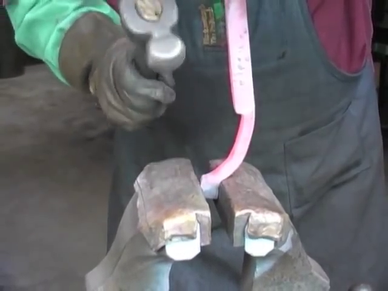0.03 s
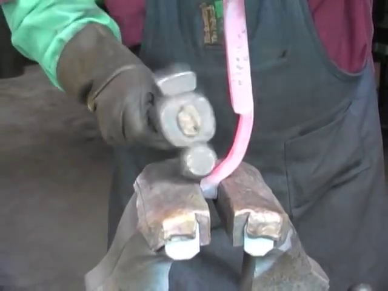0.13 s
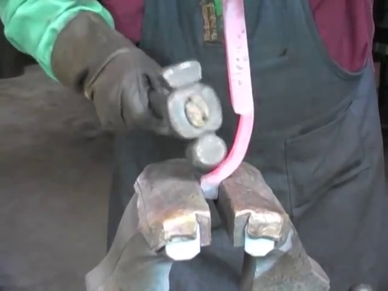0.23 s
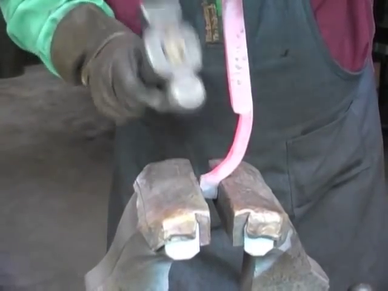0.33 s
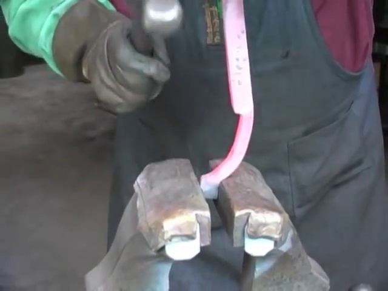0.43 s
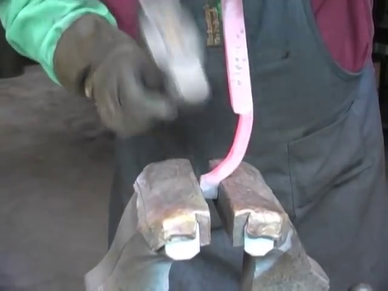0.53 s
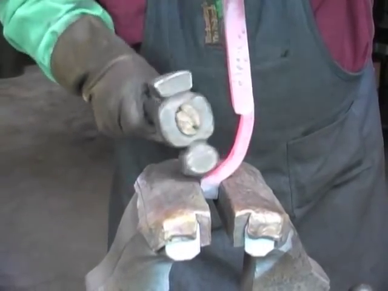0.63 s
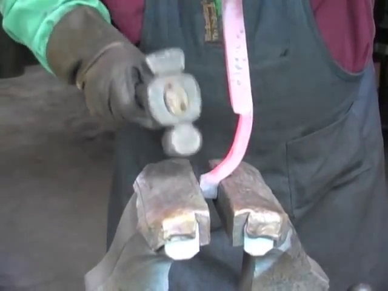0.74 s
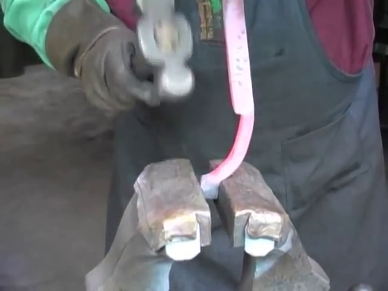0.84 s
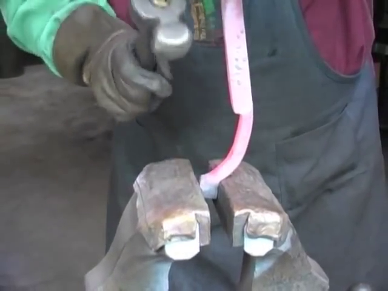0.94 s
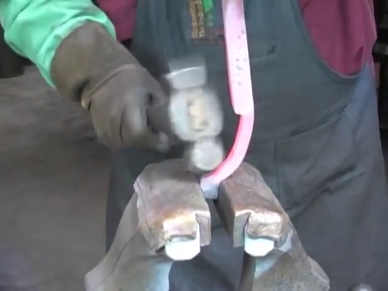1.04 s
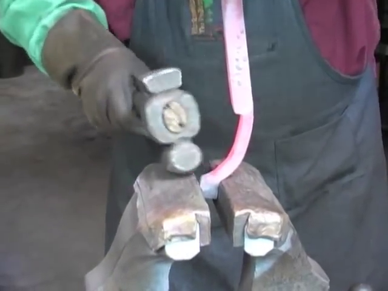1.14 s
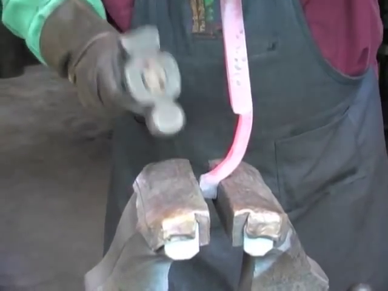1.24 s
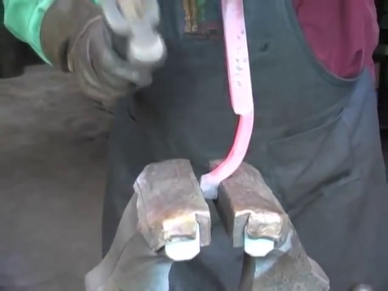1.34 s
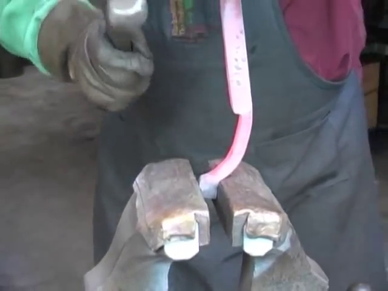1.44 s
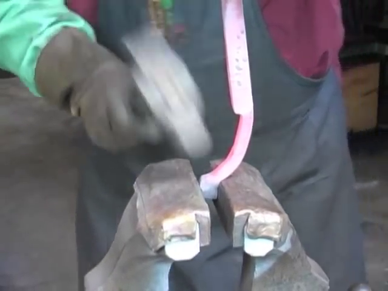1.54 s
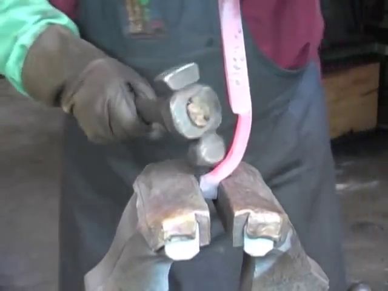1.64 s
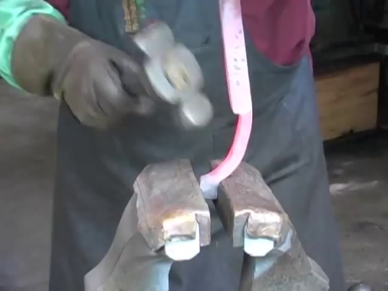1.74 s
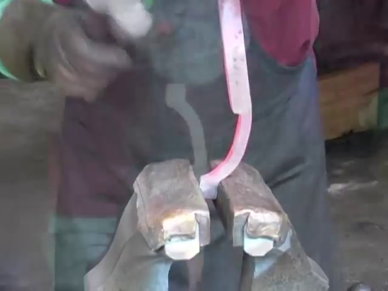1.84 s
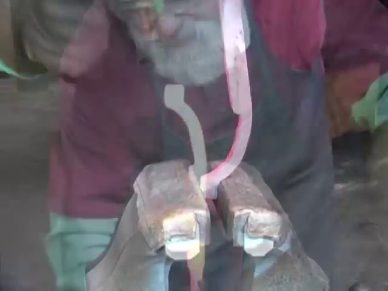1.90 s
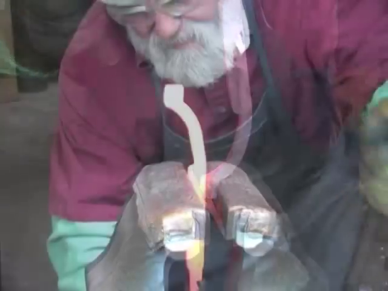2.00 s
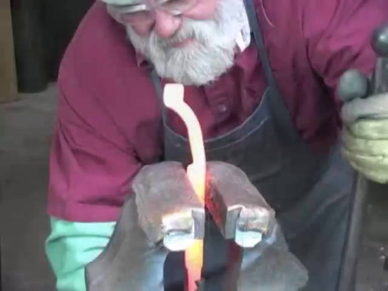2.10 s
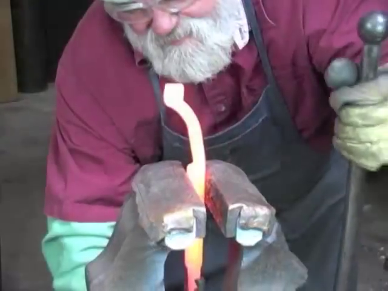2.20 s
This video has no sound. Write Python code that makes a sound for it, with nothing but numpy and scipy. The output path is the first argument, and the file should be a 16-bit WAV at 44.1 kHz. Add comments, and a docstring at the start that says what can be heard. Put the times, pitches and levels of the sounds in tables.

```python
"""Four hard, ringing hammer blows on red-hot steel in a vise, close to the microphones; a light metal tap follows.
The echo and last ringing of an earlier blow open the scene.
Each strike sums decaying noise (the clack), damped sines (hammer and vise) and a low thud through the stand.
The workshop answers by convolution with decaying noise.
Behind it lie a machine's hum and air, made of shaped noise, and a faint steady whine."""
import sys
import numpy as np
from scipy import signal
from scipy.fft import rfft, irfft
from scipy.io import wavfile

SR = 44100
rng = np.random.default_rng(int(sys.argv[2]) if len(sys.argv) > 2 else 0)


def to_wav(sig):
    """Store sig (one row per channel, or 1-D mono) as 16-bit WAV at the path in sys.argv[1].

    Samples outside -1..1 are clipped; the rate is SR.
    """
    pcm = np.clip(np.atleast_2d(sig), -1, 1) * 32767
    pcm = np.round(pcm).astype(np.int16)
    wavfile.write(sys.argv[1], SR, pcm.T)  # frames by channels


N = 101430

# Hammer blows, timed from the start of what is heard; a negative time is an earlier blow:
# (time [s], level [dB], extra ring level [dB], treble tilt [dB per octave], clack t60 [s],
#  extra thud level [dB], first favoured mode [Hz], second favoured mode [Hz])
HAMMER_BLOWS = [(-0.235, 1.5, -4, -0.5, 0.077, 1.5, 1690, 2914),
                (0.2115, 2, -2, 0.85, 0.037, -4, 2914, 7607), (0.6487, -4, -5, 0.24, 0.066, 5, 1690, 10788),
                (1.1127, 0.5, -4.5, -0.43, 0.041, -1.5, 3030, 3911),
                (1.6298, 0.5, -0.5, -0.36, 0.051, 1, 4742, 3030)]
# Light taps of metal on the vise: same columns as the blows
VISE_TAPS = [(2.2254, -20, -7, 0.91, 0.077, 0, 3030, 6060)]
# Colour of the clack, dense and quickly damped modes: (frequency [Hz], relative level per Hz [dB])
CLACK_COLOUR = [(100, -13), (400, -14.5), (800, -5.5), (1200, -4), (2300, -4), (3000, -4), (3400, -3.5),
                (4600, 1.5), (5400, -2.5), (6200, 2.5), (7200, 3.5), (8000, 1), (8900, 0), (9500, -4.5),
                (11000, -4), (12000, -7), (12800, -2), (14000, -22)]
# Colour of the thud through the stand: (frequency [Hz], relative level per Hz [dB])
THUD_COLOUR = [(30, -28), (70, -10.5), (170, 2), (300, -8.5), (700, -13.5), (2000, -37)]
# Ringing modes of hammer and vise, three lists in the same order: (pitch [Hz])
MODE_PITCHES = [1690, 1755, 2914, 3030, 3640, 3911, 4742, 6060, 6260, 6581, 6780, 7607, 8845, 10788]
# Base level of each mode, before the strike's own offsets: (level [dB])
MODE_LEVELS = [-38.5, -47, -42, -40.5, -39.5, -42, -45.5, -43.5, -40, -49.5, -43.5, -45.5, -41, -33]
# Decay of each mode: (t60 [s])
MODE_DECAYS = [0.091, 0.26, 0.11, 0.11, 0.087, .13, 0.13, .1, .17, 0.061, .11, 0.12, .08, 0.047]
# Colour of the workshop's echo tail: (frequency [Hz], relative level [dB])
ECHO_COLOUR = [(60, -4.5), (300, -1), (900, -2), (1900, 4), (3500, 0), (7000, -4), (10000, -6), (14000, -9)]
# Decay of the echo tail: (frequency [Hz], t60 [s])
ECHO_DECAY = [(100, 1), (700, 0.58), (1800, 0.57), (4000, 0.51), (8000, 0.44), (13000, .36)]
# Machine hum, before background level and pan: (frequency [Hz], level [dB], width at half gain [Hz])
HUM_BANDS = [(167, -71, 12), (230.3, -71, 20), (375.5, -73.5, 23), (450.6, -83, 10)]
# Colour of machine rumble and air: (frequency [Hz], relative level per Hz [dB])
AIR_COLOUR = [(25, -17.5), (50, -16), (78, -0.5), (115, -9.5), (170, -6), (240, 2.5), (300, -2.5),
              (390, -1), (520, -10), (800, -17.5), (1700, -18), (3200, -21.5), (7000, -25), (13000, -28.5),
              (15000, -30)]
# Course of the hum and air: (time [s], level [dB])
BACKGROUND_LEVEL = [(0, -1), (1.6, -0.5), (1.85, -3.5), (2.0, -5.5), (2.3, -2)]

# Strike: base levels in dB, times in seconds
CRACK_DB, CRACK_T60_S = -28, 0.0138  # the first instant of contact
CLACK_DB, CONTACT_S = -24, 0.0013
CHATTER_DB, CHATTER_T60_S = -41, 0.13  # the work shudders in the jaws
THUD_DB, THUD_RISE_S, THUD_T60_S = -44, 0.0077, 0.18
FAVOUR_DB, FAVOUR_WIDTH_HZ = 9, 70  # lift of the modes near the favoured pitches
MODE_SCATTER_DB = 2.5  # standard deviation
STRIKE_S, LEAD_S = 0.4, 0.5  # length of one strike; time kept ahead of the start

# Workshop: ring and tap levels are offsets on what is sent into the room
ROOM_DB, ROOM_BUILD_S, ECHO_S = -8, 0.0054, 0.8
NEAR_DB, NEAR_DELAY_S, NEAR_T60_S = -10, 0.0037, 0.16  # reflections off the smith and the floor
RING_ROOM_DB, TAP_ROOM_DB = -6.5, -10  # the pure ring carries into the room less than the clack
ROOM_SHARED = 0.47  # share of the echo's power that is alike at both microphones

# Machine: levels before pan
AIR_DB, AIR_SIDE_DB = -65.5, -8  # the side level is relative to the middle
WHINE_HZ, WHINE_DB = 2447, -82

PAN_DB, MACHINE_PAN_DB = -4, -4  # left minus right
TOP_HZ = 14200


def strike(t, hz, level_db, ring_db, tilt_db, clack_t60, thud_db, first_hz, second_hz):
    """Steel meets steel: crack, clack and chatter of many modes, a few long modes, and the stand's thud."""
    contact = clack(t, hz, tilt_db, clack_t60) + ring(t, ring_db, first_hz, second_hz)
    onset = np.minimum(t / CONTACT_S, 1)
    body = undb(THUD_DB + thud_db) * thud(t, hz)
    return undb(level_db) * (contact * onset + body)


def clack(t, hz, tilt_db, clack_t60):
    """Dense damped modes blur into noise whose power decays in three stages."""
    octaves = np.log2(np.maximum(hz, 500) / 5000)
    colour = undb(along(CLACK_COLOUR, hz) + tilt_db * octaves)
    stages = [(CRACK_DB, CRACK_T60_S), (CLACK_DB, clack_t60), (CHATTER_DB, CHATTER_T60_S)]
    power = sum((undb(db) * fade(t, t60)) ** 2 for db, t60 in stages)
    return noise(colour) * np.sqrt(power)


def ring(t, ring_db, first_hz, second_hz):
    """Hammer and vise ring as damped sines; the point of contact favours two pitches."""
    out = np.zeros(len(t))
    for pitch, mode_db, t60 in zip(MODE_PITCHES, MODE_LEVELS, MODE_DECAYS):
        distance = min(abs(pitch - first_hz), abs(pitch - second_hz))
        favour_db = FAVOUR_DB * np.exp(-(distance / FAVOUR_WIDTH_HZ) ** 2)
        scatter_db = MODE_SCATTER_DB * rng.standard_normal()
        size = undb(mode_db + ring_db + favour_db + scatter_db)
        out += size * fade(t, t60) * np.sin(2 * np.pi * (pitch * t + rng.random()))
    return out


def thud(t, hz):
    """The stand takes the blow as low noise that swells briefly and decays."""
    swell = 1 - np.exp(-t / THUD_RISE_S)
    return noise(undb(along(THUD_COLOUR, hz))) * swell * fade(t, THUD_T60_S)


def play(rows, more_ring_db=0):
    """Lay strikes on a time line that begins LEAD_S early, each with fresh random draws."""
    out = np.zeros(2 * N)
    t, hz = axes(count=round(STRIKE_S * SR))
    for start, level_db, ring_db, *rest in rows:
        i = int((start + LEAD_S) * SR)
        out[i:i + len(t)] += strike(t, hz, level_db, ring_db + more_ring_db, *rest)
    return out[:N + int(LEAD_S * SR)]


def workshop():
    """Echo from one direction, with its own mix of the steel: near reflections and a coloured tail."""
    response = room_response()
    blows = play(HAMMER_BLOWS, RING_ROOM_DB)
    taps = undb(TAP_ROOM_DB) * play(VISE_TAPS, RING_ROOM_DB)
    sent = blows + taps
    return signal.fftconvolve(sent, response)[:len(sent)]


def room_response():
    """Many reflections act as noise; the walls' tail decays band by band, its treble first."""
    t, hz = axes(count=round(ECHO_S * SR))
    centres = np.geomspace(60, 15000, num=14)
    spectrum = rfft(noise(undb(along(ECHO_COLOUR, hz))))
    tail = np.zeros(len(t))
    for centre, peak in zip(centres, np.eye(len(centres))):
        band = along(list(zip(centres, peak)), hz)  # overlapping triangles that sum to one
        tail += irfft(spectrum * band) * fade(t, along(ECHO_DECAY, centre))
    tail = tail * (1 - np.exp(-t / ROOM_BUILD_S))
    near = rng.standard_normal(len(t)) * (t > NEAR_DELAY_S) * fade(t, NEAR_T60_S)
    mix = undb(ROOM_DB) * unit(tail) + undb(NEAR_DB) * unit(near)
    return mix / np.sqrt(len(t))  # each part's energy follows its level


def machine():
    """Wavering hum and air, spread between the microphones by a side signal, with a steady whine."""
    t, hz = axes(count=N)
    middle = hum_and_air(hz)
    side = undb(AIR_SIDE_DB) * hum_and_air(hz)
    both = middle + side * np.array([[1], [-1]])
    level = undb(np.interp(t, *np.array(BACKGROUND_LEVEL).T))
    whine = undb(WHINE_DB) * np.sqrt(2) * np.sin(2 * np.pi * WHINE_HZ * t)
    return (both * level + whine) * pan(MACHINE_PAN_DB)


def hum_and_air(hz):
    """Narrow noise bands waver as hum over broad rumble and air noise."""
    hum = sum(undb(db) * noise(1 / (1 + (2 * (hz - f) / width) ** 2)) for f, db, width in HUM_BANDS)
    return hum + undb(AIR_DB) * noise(undb(along(AIR_COLOUR, hz)))


def undb(db):
    """Decibels to gain."""
    return 10 ** (np.asarray(db) / 20)


def unit(x):
    """Scale to rms 1."""
    return x / np.sqrt(np.mean(x ** 2))


def along(points, hz):
    """Read (frequency [Hz], value) points on a log-frequency axis."""
    f, v = np.array(points).T
    return np.interp(np.log(np.maximum(hz, 1)), np.log(f), v)


def noise(gain):
    """Noise of rms 1 with a given gain per frequency and random phases."""
    phase = 2 * np.pi * rng.random(len(gain))
    return unit(irfft(gain * np.exp(1j * phase)))


def fade(t, t60):
    """Exponential decay, 60 dB in t60 seconds."""
    return np.exp(-np.log(1000) * t / np.maximum(t60, 1e-3))


def pan(db):
    """Left and right gains for a level difference."""
    return undb(np.array([[db], [-db]]) / 2)


def axes(count):
    """Times [s] and frequencies [Hz] for a stretch of samples."""
    return np.arange(count) / SR, np.arange(count // 2 + 1) * SR / count


def scene():
    """Blows and tap close by, a little to the right, with their echo; the machine behind."""
    alike = np.sqrt(ROOM_SHARED) * workshop()
    apart = np.sqrt(1 - ROOM_SHARED) * np.array([workshop(), workshop()])
    steel = play(HAMMER_BLOWS) + play(VISE_TAPS) + alike + apart
    return steel[:, -N:] * pan(PAN_DB) + machine()  # the lead-in is dropped


def record(dry):
    """The recorder cuts the top with a steep low-pass."""
    low_pass = signal.ellip(8, 0.2, 70, TOP_HZ, fs=SR, output="sos")
    return signal.sosfilt(low_pass, dry)


dry = scene()
out = record(dry)
to_wav(out)
```